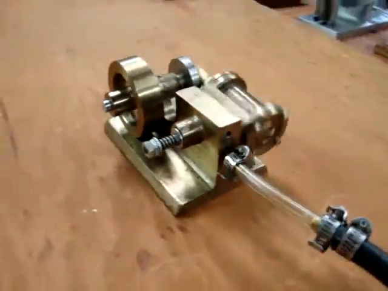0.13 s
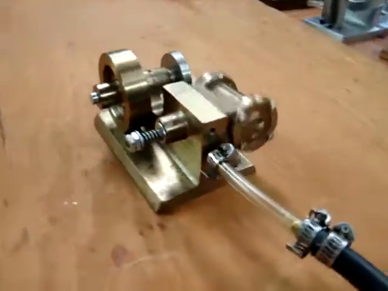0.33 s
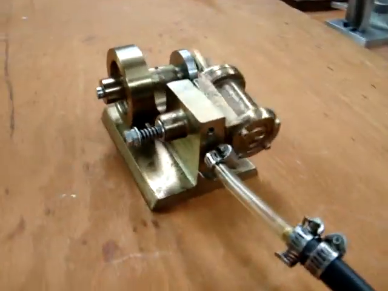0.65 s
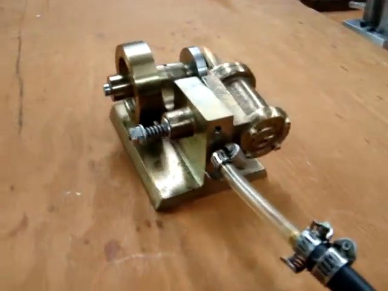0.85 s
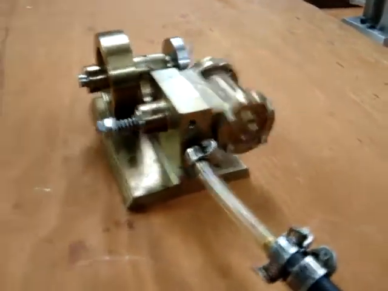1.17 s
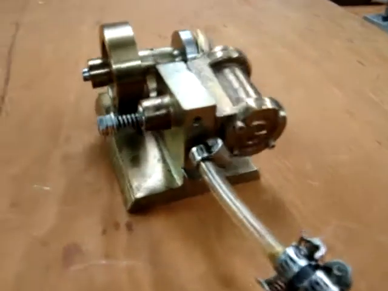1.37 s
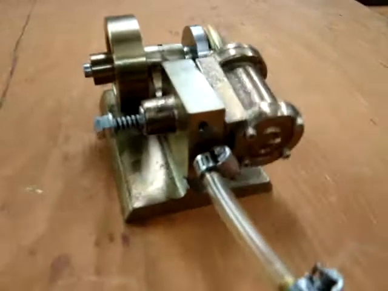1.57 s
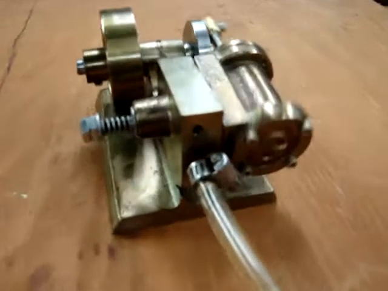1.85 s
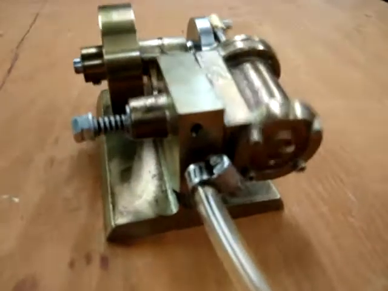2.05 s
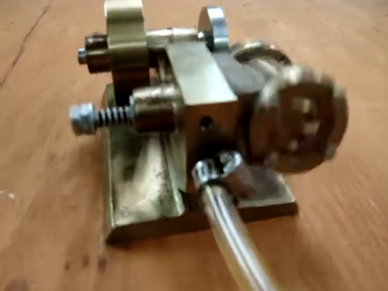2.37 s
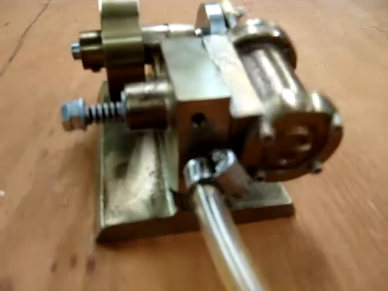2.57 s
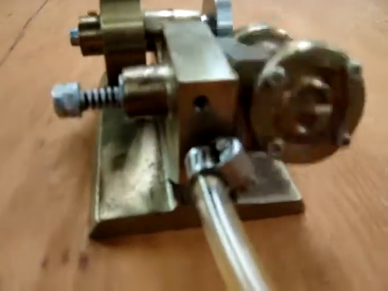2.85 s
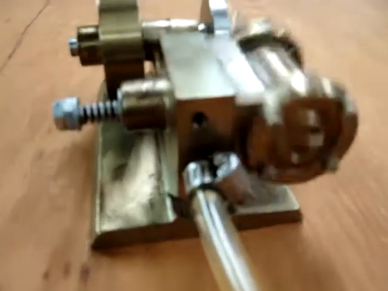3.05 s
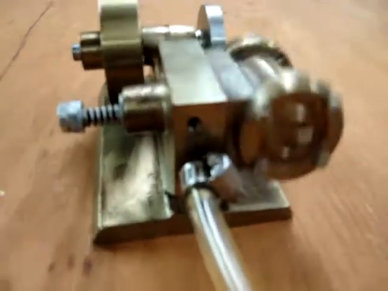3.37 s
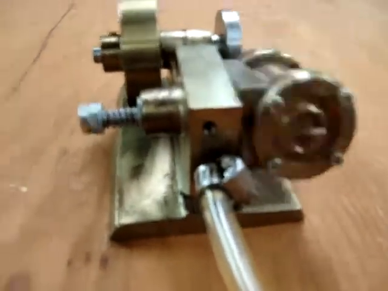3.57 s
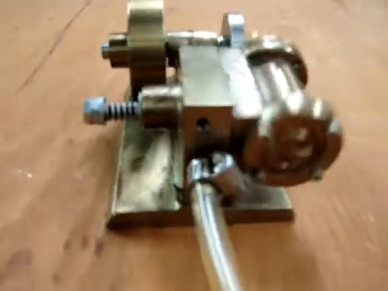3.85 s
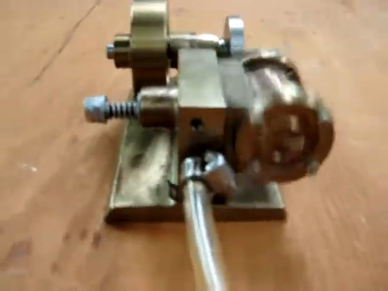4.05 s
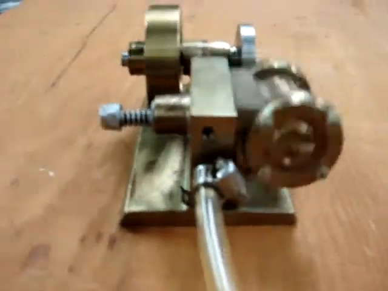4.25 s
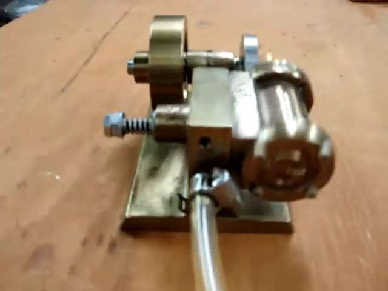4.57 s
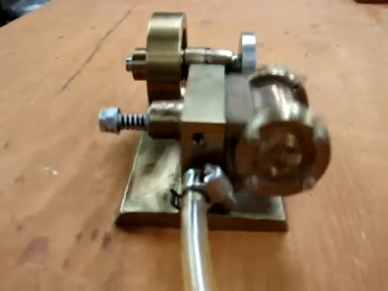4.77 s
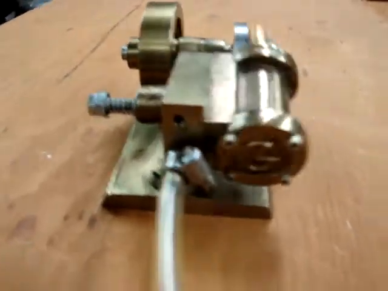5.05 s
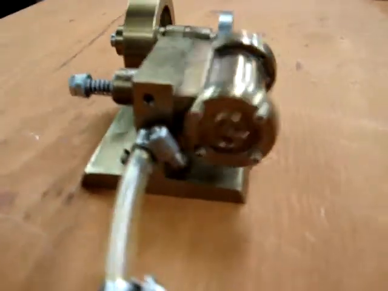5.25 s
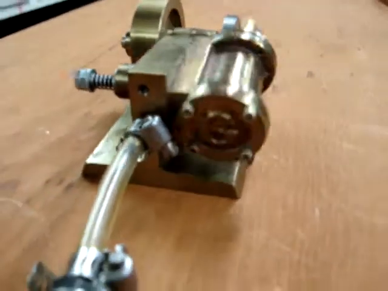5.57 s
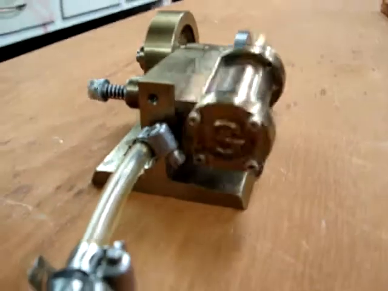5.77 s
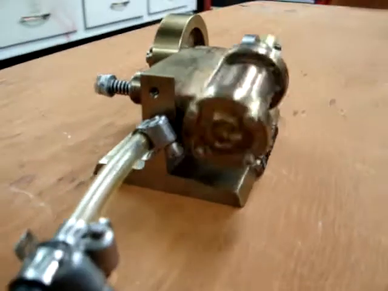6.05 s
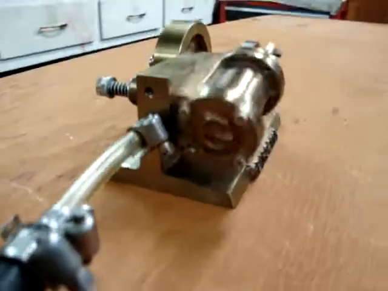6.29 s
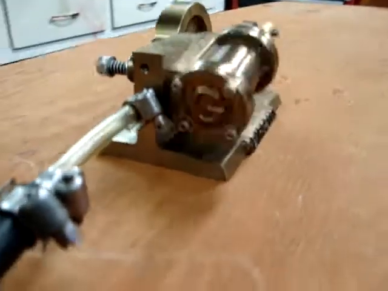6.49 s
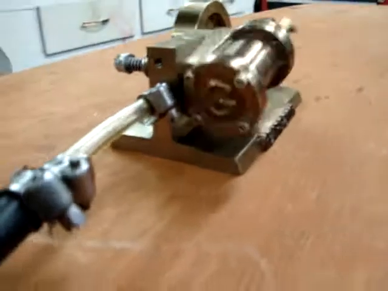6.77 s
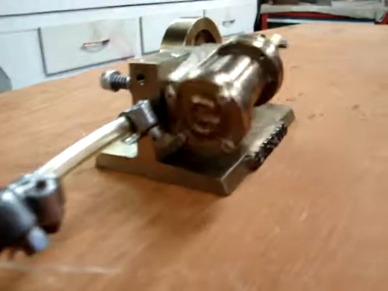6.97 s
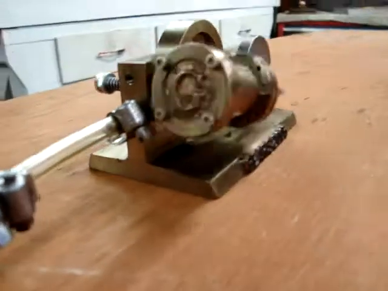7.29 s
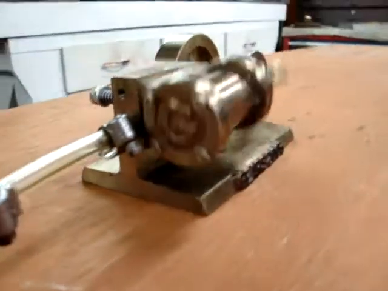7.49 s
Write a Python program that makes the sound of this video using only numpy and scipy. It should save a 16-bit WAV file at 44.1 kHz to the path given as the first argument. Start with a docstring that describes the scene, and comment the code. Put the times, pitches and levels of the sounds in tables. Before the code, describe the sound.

A small steam engine runs steadily with rapid, hissing puffs and light mechanical knocks, while things occasionally clatter elsewhere in the workshop.

```python
"""Hissing, knocking and puffing, a small brass steam engine runs at an even speed on a wooden bench.
Its oscillating cylinder opens and shuts the ports, so each turn lets out turbulent jets: a sharp exhaust
puff, a softer second puff and the inlet's hiss, with a whistle from the port cavity. Play in the
bearings knocks at both ends of the stroke. The microphone moves round to the side of the cylinder.
Over a faint hum, things clatter now and then elsewhere in the workshop; once, the base judders."""
import sys
import numpy as np
from scipy import signal
from scipy.fft import rfft, irfft, next_fast_len
from scipy.io import wavfile

SR = 44100
rng = np.random.default_rng(int(sys.argv[2]) if len(sys.argv) > 2 else 0)


def master_out(mix):
    """Clip the mix to full scale and print it as 16-bit PCM to the path in sys.argv[1]."""
    frames = np.transpose(np.atleast_2d(mix))
    ceiling = np.clip(frames, -1, 1)
    pcm = np.round(ceiling * 32767).astype(np.int16)
    wavfile.write(sys.argv[1], SR, pcm)


N = 336483
TIME = np.arange(N) / SR


def from_db(db):
    """Amplitude grows tenfold for every 20 dB."""
    return 10 ** (np.asarray(db) / 20)


def columns_at(rows, at_s):
    """Linear interpolation in time of each column after the first."""
    times, *columns = np.transpose(rows)
    return [np.interp(at_s, times, column) for column in columns]


def level_at_hz(spectrum, hz):
    """Interpolation of a spectrum's level on a logarithmic frequency axis."""
    knots_hz, db = np.transpose(spectrum)
    return np.interp(np.log(np.maximum(hz, 1)), np.log(knots_hz), db)


def butterworth(x, hz, kind, order):
    """A Butterworth filter: maximally flat in its passband."""
    return signal.sosfilt(signal.butter(order, hz, kind, fs=SR, output="sos"), x)


def resonance(x, hz, width_hz):
    """A resonator passes a narrow band about its natural frequency."""
    return butterworth(x, [hz - width_hz / 2, hz + width_hz / 2], "band", order=1)


def noise(spectrum):
    """Spectral shaping: white noise takes the given density, falling away below the lowest point."""
    size = next_fast_len(N)
    hz = np.fft.rfftfreq(size, 1 / SR)
    bass_rolloff = np.minimum(hz / spectrum[0][0], 1) ** 2
    gain = from_db(level_at_hz(spectrum, hz)) * bass_rolloff
    return irfft(rfft(rng.standard_normal(size)) * gain, size)[:N] * np.sqrt(SR / 2)


def flutter(depth_db, per_s):
    """Random amplitude modulation: a gain that wanders about unity."""
    wander = np.interp(TIME * per_s, np.arange(N // 8), rng.standard_normal(N // 8))
    return from_db(depth_db * wander)


# supply pressure, as the strength of the puffs: time_s, level_db
SUPPLY_PRESSURE = [(0, 6), (.6, 6.5), (2.0, 1.5), (3.1, 3.3), (4.1, 4.7), (4.75, 4), (5.3, 7.5), (5.9, 4.5),
                   (7.63, 4.5)]


def flywheel_turns(first_puff_s=.048, period_s=.23354, lengthening_s=1.3e-5):
    """Near-periodic rotation, about 257 turns a minute: each exhaust opening's time and pressure level."""
    turn = np.arange(-1, N / SR / period_s + 1)
    turn_s = first_puff_s + period_s * turn + lengthening_s * turn ** 2 / 2
    return turn_s, columns_at(SUPPLY_PRESSURE, turn_s)[0]


# stages of the flow and the rub of the port faces, timed from the exhaust opening:
# name -> start_s, full_s, fading_s, shut_s, pressure_share
PORT_STAGES = { "release": (-.0125, .003, .009, .022, 1.0), "blowdown": (.006, .016, .022, .039, 1.0),
               "sweep": (.012, .040, .068, .108, .3), "second puff": (.076, .105, .113, .136, .5),
               "inlet": (.122, .184, .198, .226, .2), "rub": (.150, .195, .205, .240, .1), }
# colour that the ports give each stage: name -> frequency_hz, density_db
STAGE_SPECTRA = { "release": [(500, -86), (900, -81.5), (1800, -81), (2300, -73.5), (3200, -71),
                 (5100, -67.5), (5950, -66.5), (6350, -66), (6850, -74.5), (7400, -66.5), (8500, -63),
                 (10000, -65.5)], "blowdown": [(900, -99), (1800, -93.5), (2600, -79), (3200, -83),
                 (4700, -80.5), (5500, -66.5), (6150, -74), (6450, -72.5), (6900, -105.5), (7500, -69.5),
                 (8600, -72), (9600, -60.5), (10000, -94.5)], "sweep": [(800, -84), (1750, -85.5),
                 (2250, -76), (3200, -81.5), (4800, -78.5), (5300, -77.5), (5700, -68), (6400, -80.5),
                 (7500, -80), (8300, -90.5), (9250, -68), (9700, -88.5), (10000, -82)],
                 "second puff": [(300, -82.5), (430, -73), (800, -88.5), (1800, -85), (2500, -82),
                 (3300, -76.5), (4800, -74.5), (5350, -69.5), (5750, -72.5), (6200, -70), (6800, -87.5),
                 (7400, -72.5), (8300, -68.5), (10000, -69.5)], "inlet": [(1700, -90.5), (2800, -74.5),
                 (3400, -83.5), (4200, -89), (4900, -86), (5300, -72), (5620, -72.5), (5950, -72),
                 (6400, -88), (7100, -77), (7800, -90.5), (9100, -106), (9650, -80), (10000, -105)],
                 "rub": [(250, -91.5), (600, -75.5), (950, -74), (1300, -85.5), (1800, -92.5), (3000, -100),
                 (4500, -108), (10000, -125)], }


def port_jets(rough_db=2.73, treble_hz=4800, treble_power=3.9, passage_db=-7.5):
    """Turbulent jet noise: the rocking cylinder opens and shuts its ports, gating the flow."""
    turn_s, pressure_db = flywheel_turns()
    lowpass = signal.butter(4, treble_hz, fs=SR, output="sos")
    jets = np.zeros(N)
    for name, (start, full, fading, shut, share) in PORT_STAGES.items():
        flow, strength = np.zeros(N), np.zeros(N)
        scatter_db = .5 * rng.standard_normal(len(turn_s))
        for s, db, chance_db in zip(turn_s, pressure_db, scatter_db):
            span = slice(*np.searchsorted(TIME, [s + start, s + shut]))
            opening = np.interp(TIME[span] - s, [start, full, fading, shut], [0, 1, 1, 0])
            flow[span] = np.sin(np.pi / 2 * opening) ** 2
            strength[span] = from_db(share * db + chance_db)
        jet = noise(STAGE_SPECTRA[name])
        body = signal.sosfiltfilt(lowpass, jet)
        treble = jet - body
        # the treble grows faster with the flow, so each puff opens and closes dull
        jets += strength * (body * flow + treble * flow ** treble_power)
    # the short drilled passage rings at one pitch under every stage
    passage = from_db(passage_db) * resonance(jets, hz=5740, width_hz=220)
    return (jets + passage) * flutter(rough_db, per_s=440)


# swells as the opening edge passes, as the closing edge passes and while the inlet feeds the cavity,
# timed from the exhaust opening: start_s, peak_s, shut_s, level_db
WHISTLE_SWELLS = [(-.010, -0.006, 0.01, -40), (0.104, .123, 0.14, -42.5), (0.139, .196, 0.26, -45.5)]


def cavity_whistle(pitch_hz=2739, width_hz=330):
    """Cavity resonance: leaking air sounds the hollow behind the port, in three smooth swells a turn."""
    turn_s, _ = flywheel_turns()
    envelope = np.zeros(N)
    for s in turn_s:
        for start, peak, shut, db in WHISTLE_SWELLS:
            span = slice(*np.searchsorted(TIME, [s + start, s + shut]))
            opening = np.interp(TIME[span] - s, [start, peak, shut], [0, 1, 0])
            envelope[span] += from_db(db) * np.sin(np.pi / 2 * opening)
    band = resonance(rng.standard_normal(N), pitch_hz, width_hz)
    tone = resonance(band, pitch_hz, width_hz)
    return envelope * tone / tone.std()


# the microphone's path: time_s, jets_db, knocks_db, whistle_db, side_fraction
MICROPHONE_PATH = [(0, -2.8, -1.4, -2.5, 0.47), (.8, -6, -0.8, -7.5, .12), (1.7, -2, -1.4, -3, 0.14),
                   (3.1, -4.4, -4, 1.9, 0.13), (5.0, -6.5, -4.5, 3, 0), (5.5, -4, -3.5, 0.5, 0.38),
                   (6.1, -2.55, -5, -1.5, 0.39), (6.7, -3.5, -5, 2.5, 0.72), (7.63, -4.3, -4.5, 7, 0.73)]
# change in the jets' colour when heard from the side: frequency_hz, gain_db
SIDE_RESPONSE = [(300, -7), (1500, 0.5), (2800, -8), (3600, -19.5), (4600, -11.5), (5600, -4.5),
                 (6300, 2.5), (6900, 15.5), (7500, 6), (8400, 2), (9300, -10.5), (10000, -18.5)]
# band cancelled by the bench reflection, or lifted at negative depth: time_s, centre_hz, depth_db
BENCH_NOTCH = [(0, 7800, 20), (1.2, 7670, 10), (2, 7400, 4), (5.2, 7450, 4), (5.7, 8180, 16),
               (6.1, 8720, 10.5), (6.4, 9360, 6), (6.8, 9900, -4)]


def jet_radiation(jets, notch_width_hz=740):
    """Directivity and interference: the beamed treble and the bench reflection vary with position."""
    hz, frame_s, frames = signal.stft(jets, SR, nperseg=256)
    side_fraction = columns_at(MICROPHONE_PATH, frame_s)[-1]
    notch_hz, depth_db = columns_at(BENCH_NOTCH, frame_s)
    beam_db = level_at_hz(SIDE_RESPONSE, hz)[:, None] * side_fraction
    notch_db = depth_db * np.exp(-((hz[:, None] - notch_hz) / notch_width_hz) ** 2)
    return signal.istft(frames * from_db(beam_db - notch_db), SR)[1][:N]


# steady noise of the bearings and the workshop: frequency_hz, density_db
STEADY_SPECTRUM = [(20, -101), (95, -105), (135, -101), (200, -95), (280, -92.5), (430, -82.5), (700, -91),
                   (1700, -94), (2700, -104), (3500, -103.5), (5500, -106), (10000, -110)]
# rms levels of the mains hum: time_s, second_harmonic_db, fourth_harmonic_db
HUM_LEVELS = [(0, -78, -63), (1.1, -76.5, -64), (1.5, -83.5, -75), (7.63, -78.5, -73.5)]


def workshop_background(mains_hz=60):
    """Mains harmonics: a motor hums at twice and four times the line frequency, over broadband noise."""
    hum = np.zeros(N)
    for harmonic, db in zip((2, 4), columns_at(HUM_LEVELS, TIME)):
        cycles = harmonic * mains_hz * TIME + rng.random()
        hum += from_db(db) * np.sin(2 * np.pi * cycles)
    return noise(STEADY_SPECTRUM) + np.sqrt(2) * hum


def impulses(times, db):
    """Ideal impacts: each delivers its force in a single sample."""
    force = np.zeros(N)
    at = np.round(times * SR).astype(int)
    inside = (at >= 0) & (at < N)
    force[at[inside]] = from_db(db)[inside]
    return force


def strike(times, db, modes, pitch_ratio, spread_db):
    """Modal superposition: blows of varying strength set each mode ringing as a damped oscillator."""
    ringing = np.zeros(N)
    for hz, mode_db, t60_s in modes:
        decay = np.exp(-np.log(1000) / (t60_s * SR))
        phase_step = 2 * np.pi * hz * pitch_ratio / SR
        force = impulses(times, db + mode_db + spread_db * rng.standard_normal(len(times)))
        feedback = [1, -2 * decay * np.cos(phase_step), decay * decay]
        # the radiated pressure follows the velocity of the mode
        ringing += signal.lfilter([1, -1], feedback, force + 1e-18)
    return ringing


def cushioned(thuds, contact_hz=1190, radiation_hz=228):
    """Contact time and radiation loss: an oil film softens blows; the small base radiates little bass."""
    softened = butterworth(thuds, contact_hz, "low", order=2)
    return butterworth(softened, radiation_hz, "high", order=3)


# play in the crank and pivot, taken up after each exhaust opening: delay_s, thud_db, pitch_ratio, tick_db
BEARING_CONTACTS = [(.0688, -35.5, .945, -42), (.0838, -52, .9, -42), (.0870, -50, .64, -60),
                    (.1880, -33.5, 1.03, -55), (.1982, -38.5, 1.04, -62)]
# modes of the base plate on the bench: pitch_hz, level_db, t60_s
BASE_MODES = [(188, -22, 0.082), (240, -26, 0.26), (289.7, -21, 0.24), (385, -15.5, 0.16),
              (458.8, 3.5, 0.038), (588, -20, 0.24), (722, -21.5, 0.081), (915, -15, 0.092),
              (1160, -15.5, 0.044), (1452, -13, 0.086)]
# modes of the brass parts: pitch_hz, level_db, t60_s
BRASS_MODES = [(1250, -3, .014), (1850, -2, .012), (2240, -1, .04), (2800, 1, .011), (3900, -1, .007),
               (5600, 0, .006), (8300, -3, .004)]


def bearing_knocks(jitter_s=0.00044, pressure_share=0.22):
    """Backlash: the load reverses twice a turn; the bearings knock and rebound, ringing base and brass."""
    turn_s, pressure_db = flywheel_turns()
    force_db = pressure_share * pressure_db
    thuds, ticks = np.zeros(N), np.zeros(N)
    for delay_s, thud_db, pitch_ratio, tick_db in BEARING_CONTACTS:
        times = turn_s + delay_s + jitter_s * rng.standard_normal(len(turn_s))
        thuds += strike(times, force_db + thud_db, BASE_MODES, pitch_ratio, spread_db=1)
        ticks += strike(times, force_db + tick_db, BRASS_MODES, pitch_ratio=1, spread_db=1.5)
    lowest_brass_hz = BRASS_MODES[0][0]
    return cushioned(thuds) + butterworth(ticks, lowest_brass_hz, "high", order=2)


# blows elsewhere in the workshop: start_s, level_db, relative_ring_db
CLATTER_BLOWS = [(0.003, -44, 0), (0.366, -43.5, -4), (0.602, -45, 7), (0.741, -38.5, -6),
                 (0.805, -40.5, 4), (0.875, -39, 3), (1.574, -44, 2.5), (1.837, -50, -10),
                 (2.165, -42.5, -6), (2.209, -33.5, -21), (2.246, -35, -12), (5.454, -42.5, 8),
                 (5.631, -56, 17), (5.811, -44.5, -9), (5.84, -47, -5), (5.917, -50.5, -2),
                 (6.428, -47, 10.5), (6.55, -50.5, 6), (6.911, -50, -2)]
# colour of those blows: frequency_hz, density_db
CLATTER_SPECTRUM = [(60, -95), (110, -78), (180, -49), (400, -39.5), (780, -30), (980, -37), (1220, -32),
                    (1450, -33.5), (1900, -33), (2600, -32.5), (4400, -39), (6200, -38), (8000, -49),
                    (10000, -87)]
# resonances of the clattering things: pitch_hz, width_hz
CLATTER_MODES = [(1222, 55), (1395, 78), (1872, 16)]


def workshop_clatter(t60_s=0.28, grain_db=0.5):
    """Reverberant decay: distant blows arrive as a fading wash of reflections, some ringing like metal."""
    wash_power, ring_power = np.zeros(N), np.zeros(N)
    for start_s, db, ring_db in CLATTER_BLOWS:
        span = slice(*np.searchsorted(TIME, [start_s, start_s + 2 * t60_s]))
        decay = np.exp(-np.log(1000) * (TIME[span] - start_s) / t60_s)
        power = (from_db(db) * decay) ** 2
        wash_power[span] += power
        ring_power[span] += power * from_db(ring_db) ** 2
    force = np.sqrt(ring_power) * noise(CLATTER_SPECTRUM)
    ringing = sum(resonance(force, hz, width_hz) for hz, width_hz in CLATTER_MODES)
    wash = np.sqrt(wash_power) * noise(CLATTER_SPECTRUM)
    return ringing + wash * flutter(grain_db, per_s=2200)


def base_judder(start_s=4.3068, level_db=-35, hops=4, hop_s=.0105, loss_db=3.5):
    """Inelastic impacts: the base hops quickly and evenly on the bench, losing strength at each hop."""
    hop = np.arange(hops)
    times = start_s + hop_s * hop
    force_db = level_db - loss_db * hop
    return cushioned(strike(times, force_db, BASE_MODES, pitch_ratio=0.99, spread_db=1))


def scene():
    """Superposition: the nearby engine and the workshop around it add at the moving microphone."""
    jets_db, knocks_db, whistle_db, _ = columns_at(MICROPHONE_PATH, TIME)
    jets = jet_radiation(port_jets() + from_db(whistle_db) * cavity_whistle())
    engine = from_db(jets_db) * jets + from_db(knocks_db) * bearing_knocks() + base_judder()
    return (engine + workshop_clatter() + workshop_background())[None]


def record(dry):
    """Band limiting: an elliptic low-pass filter cuts the treble steeply above 10050 Hz."""
    return signal.sosfilt(signal.ellip(12, .2, 70, 10050, fs=SR, output="sos"), dry)


dry = scene()
out = record(dry)
master_out(out)
```